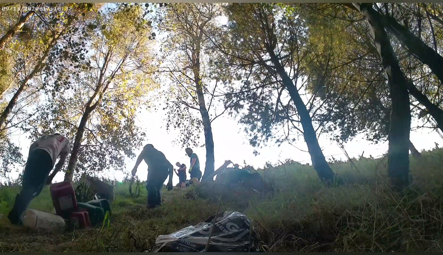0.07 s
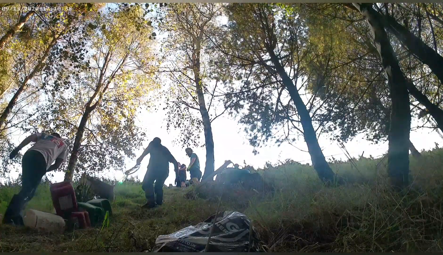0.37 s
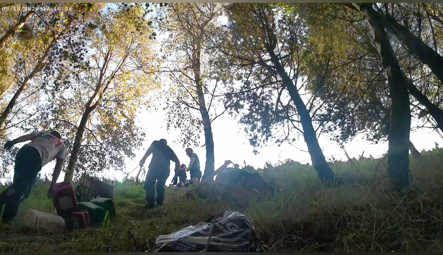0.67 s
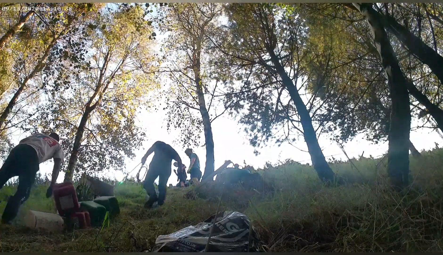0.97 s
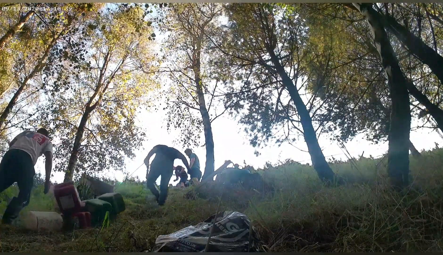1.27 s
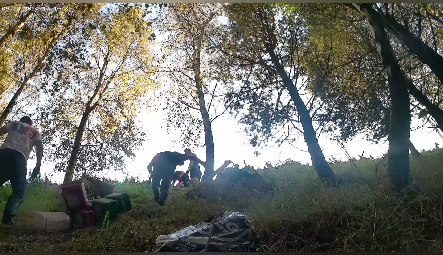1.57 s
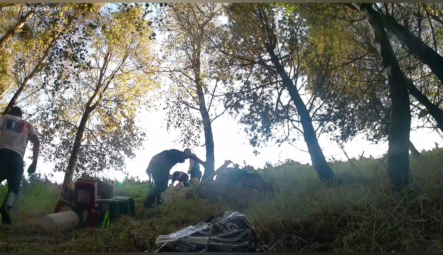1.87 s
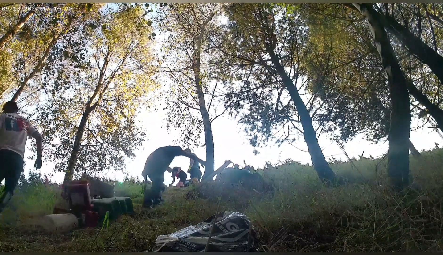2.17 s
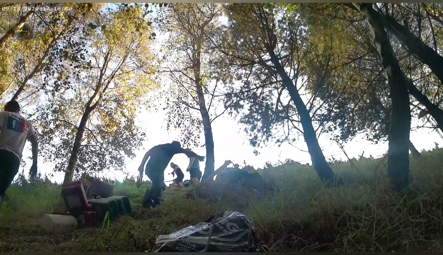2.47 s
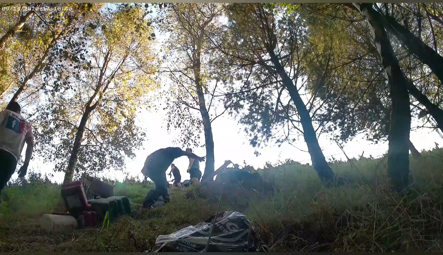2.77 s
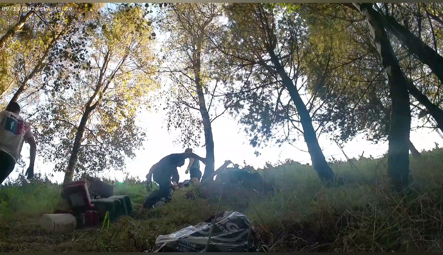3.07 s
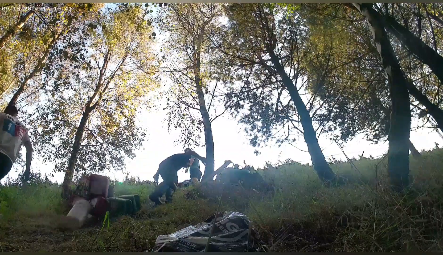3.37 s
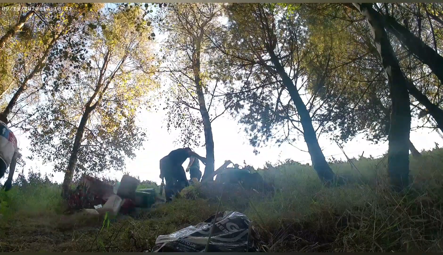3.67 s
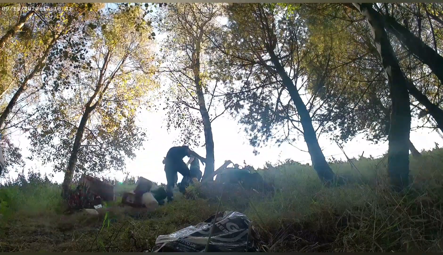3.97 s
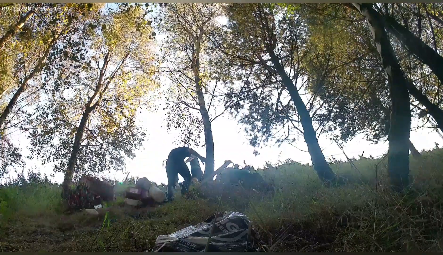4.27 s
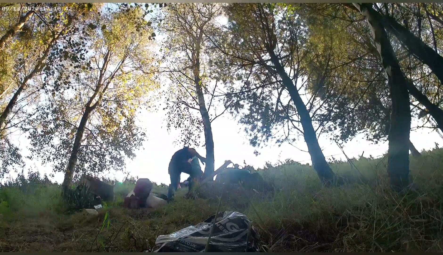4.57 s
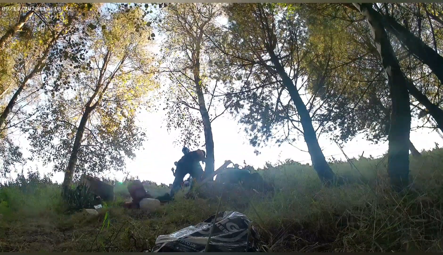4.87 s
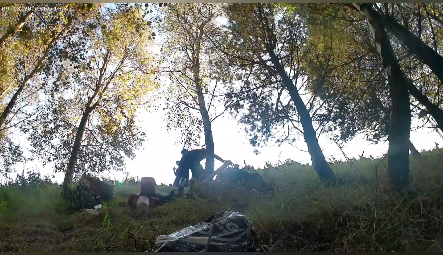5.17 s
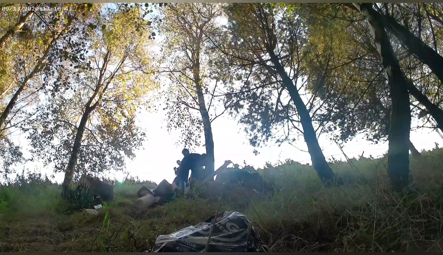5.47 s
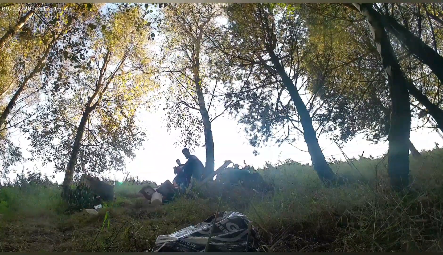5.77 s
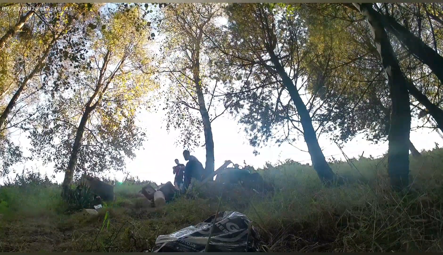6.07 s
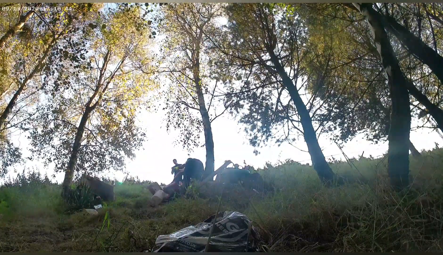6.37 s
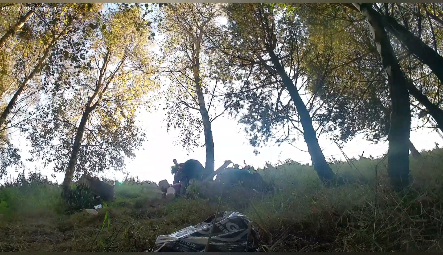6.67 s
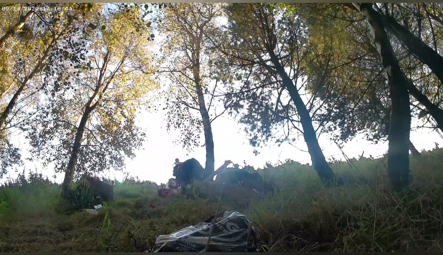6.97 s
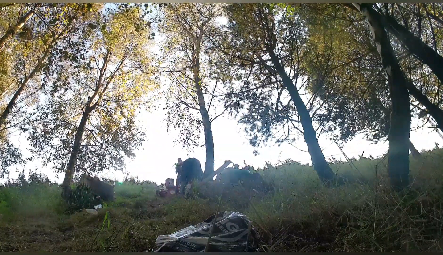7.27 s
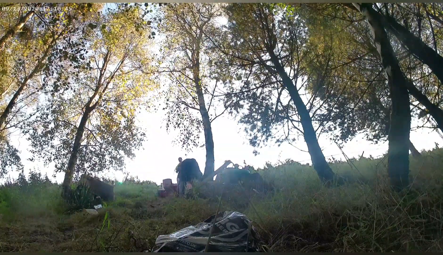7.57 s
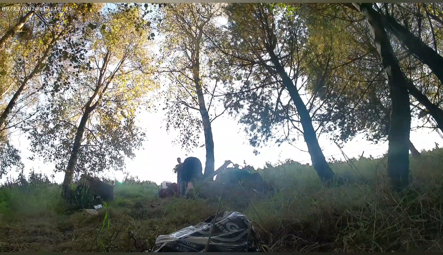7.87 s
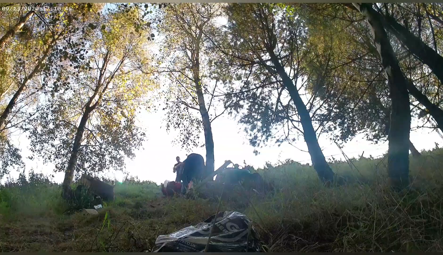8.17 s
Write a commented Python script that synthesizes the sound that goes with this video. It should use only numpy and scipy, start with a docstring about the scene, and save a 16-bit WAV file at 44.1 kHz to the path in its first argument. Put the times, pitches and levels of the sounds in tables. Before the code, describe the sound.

Light wind rumbles on the microphone over a faint, distant outdoor wash. Between about 0.5 and 2.3 seconds, a few soft, dull footsteps land on turf. Just after 3 seconds, plastic edges clack and give a tiny squeak as a load of canisters and boxes starts to be dragged nearby. From 3.4 to 4.3 seconds they tumble in a dense run of hollow thuds, the loudest part, scraping through dry grass while stems crackle and twigs snap. Softer knocks and jostling follow in uneven tugs until about 5.8 seconds. After a short lull the bumping resumes at 6.3 seconds, with a second strong cluster around 7 seconds, then lighter thuds until the end just past 8 seconds. The trees return faint, dull echoes. Far away, a low engine drone sinks in pitch and swells slightly between 5.5 and 7 seconds.

```python
"""A grassy bank under trees, one microphone in the open with a light wind on it.
Close by, after a few footfalls, dumped plastic canisters and boxes are dragged uphill in tugs.
They tumble, thud hollowly on the turf, jostle, clack and scrape through dry grass and twigs,
and the trunks throw back faint echoes. Far off lie a wash of outdoor noise and a droning engine."""
import sys
import numpy as np
from scipy import signal
from scipy.fft import rfft, irfft, next_fast_len
from scipy.io import wavfile
from scipy.ndimage import uniform_filter1d

SR = 44100
rng = np.random.default_rng(int(sys.argv[2]) if len(sys.argv) > 2 else 0)


def persist_wave(psi):
    """Save psi, clipped to +-1, as 16-bit WAV."""
    counts = np.round(np.clip(psi, -1, 1) * 32767).astype(np.int16)
    wavfile.write(sys.argv[1], SR, np.atleast_2d(counts).T)


N = 362502
TIME = np.arange(N) / SR
RUSTLE_SETTLE_S = 0.077   # how fast the rustle dies when the load stops

# Air cavities and walls of the containers. Each row: pitch in Hz, relative level in dB, t60 in seconds.
BOX_MODES = [(70.6, -19, 0.12), (91.9, -12, 0.42), (105.2, 0, 0.28), (124.9, -8.5, 0.52),
             (160.4, -4.5, 0.22), (179.6, -2, 0.28), (211.2, -1, 0.14), (239.4, -7.5, 0.11),
             (270.1, -1.5, 0.13), (318.4, -4, 0.11), (356.2, -0.5, 0.1), (424, -10, 0.15),
             (467.7, -4, 0.083), (520.4, -4.5, 0.054), (600, -10, 0.096), (690, -14.5, 0.083),
             (771, -15.5, 0.12), (778, -16, 0.015), (1064, -24.5, 0.026), (1187, -27.5, 0.082)]
# Containers landing on turf. Each row: start in seconds, relative peak in dB, relative shell slap
# in dB, favoured resonance in Hz, ring time as a share of the modes' t60.
LANDINGS = [(3.389, -19.5, -9.5, 391, 0.48), (3.412, -21.5, -3, 377, 0.49), (3.449, -26.5, -20, 186, 1),
            (3.602, -28.5, 4, 200, 1), (3.637, -19.5, -3, 216, 1), (3.671, -22.5, -13, 259, 0.77),
            (3.690, -15, -0.5, 520, 0.31), (3.752, -19, -17, 272, 1), (3.796, -21, -2, 109, .5),
            (3.846, -13, -12, 109, 0.43), (3.866, -15, -5, 301, 0.84), (3.885, -17, -3, 208, 0.87),
            (3.926, -18.5, -15, 176, 0.59), (3.958, -19.5, -2.5, 272, 0.6), (4.035, -14, -8, 248.5, 0.66),
            (4.103, -20, -2.5, 190, 1), (4.184, -22.5, -11, 170, 1), (4.227, -22.5, -3, 196, 1),
            (4.297, -34, -7, 167, 1), (4.492, -34, -11, 156, 0.85), (4.557, -31, -2, 282, 1),
            (4.595, -27, -6, 310, 1), (4.706, -25.5, -5.5, 335, 0.65), (4.749, -27.5, 0, 530, 0.6),
            (4.781, -24, -26, 126, 1), (4.845, -29.5, -16, 125, 0.78), (5.108, -32, -7.5, 202, 0.65),
            (5.277, -31, -8, 198, 1), (5.337, -33, -3, 225, 0.68), (5.399, -27.5, -4, 144, 0.73),
            (5.499, -26, -2, 350, 0.63), (5.578, -34, -3, 106, 0.82), (5.716, -29, -4, 108, 0.79),
            (5.743, -29, -27, 111, 0.55), (6.344, -29, -16, 165, 0.85), (6.376, -24, -11, 378, 0.8),
            (6.53, -30.5, -1, 198, 1), (6.607, -42, -2, 460, 0.45), (6.665, -24.5, -3, 250, 0.79),
            (6.777, -36, -4, 128, 1), (6.885, -26.5, -2, 449, 1), (6.926, -23.5, -12, 283, 0.9),
            (6.970, -27, -16, 208, 0.56), (6.998, -19, -3.5, 272, 0.9), (7.016, -15.5, -13, 217, 0.24),
            (7.046, -23.5, -15, 177, 0.33), (7.124, -29, 2.5, 443, 0.32), (7.137, -25, -13, 255, 0.99),
            (7.243, -38.5, 8, 460, 1), (7.293, -30, -26, 251, 0.5), (7.4, -32.5, -1.5, 600, 0.37),
            (7.448, -32.5, -0.5, 440, 0.67), (7.631, -34, 0.5, 198, 1), (7.686, -33.5, -16, 453, 0.7),
            (7.864, -27, -3, 162, 0.32), (7.884, -26.5, -3.5, 270, 0.86), (7.929, -29, -10, 161, .7),
            (7.986, -27, -2.5, 200, 0.58), (8.123, -34.5, -6, 166, .8)]
# The spectrum of a dry crack. Each row: frequency in Hz, relative level in dB.
CRACK_SPECTRUM = [(400, -13), (800, 8), (2300, 8), (3200, -8.5), (4500, -7), (6500, -32), (12000, -62)]


def from_db(db):
    """Decibels to gain."""
    return 10 ** (np.asarray(db) / 20)


def rms_one(x):
    """Scale to rms 1."""
    return x / np.sqrt(np.mean(x ** 2) + 1e-20)


def drift(rate_hz):
    """Smooth random wandering of spread 1."""
    step, run_in = 40, 2000
    pole = np.exp(-2 * np.pi * rate_hz * step / SR)
    noise = rng.standard_normal(N // step + run_in + 2)
    slow = signal.lfilter([1], [1, -2 * pole, pole * pole], noise)[run_in:]
    return np.interp(np.arange(N) / step, np.arange(len(slow)), rms_one(slow))


def colour(x, spectrum):
    """Minimum-phase filter with a (Hz, dB) outline, falling 10 dB an octave past its ends; rms 1."""
    size = next_fast_len(N + SR // 2) * 2
    hz, db = np.transpose(spectrum)
    octave = np.log2(np.maximum(np.arange(size // 2 + 1) * SR / size, 1))
    outside = np.maximum(np.log2(hz[0]) - octave, 0) + np.maximum(octave - np.log2(hz[-1]), 0)
    gain = from_db(np.interp(octave, np.log2(hz), db) - 10 * outside)
    cepstrum = irfft(np.log(gain), size)
    cepstrum[size // 2:] = 0
    return rms_one(irfft(rfft(x, size) * np.exp(2 * rfft(cepstrum)), size)[:N])


def ring(force, hz, t60):
    """A unit click sets a dying sine of height 1 ringing."""
    pole = from_db(-60 / (max(t60, .001) * SR))
    angle = 2 * np.pi * hz / SR
    return signal.lfilter([0, np.sin(angle)], [1, -2 * pole * np.cos(angle), pole * pole], force + 1e-18)


def even(x, span_s):
    """Take out slow level changes and keep the fine grain."""
    power = np.abs(uniform_filter1d(x ** 2, max(int(span_s * SR), 2)))
    return x / np.sqrt(power + 1e-4 * np.mean(x ** 2))


def clicks(per_s, spread_db):
    """Random clicks of uneven size and sign."""
    pulses = (rng.random(N) < per_s / SR) * rng.choice([-1, 1], N)
    return pulses * from_db(spread_db * np.minimum(rng.exponential(1, N), 4))


def add(out, s, sound):
    """Mix a sound in at time s."""
    start = max(int(s * SR), 0)
    out[start:start + len(sound)] += sound[:N - start]


def outdoors(wash_db, swell_db, hiss_db, wind_db, gust_db):
    """A far wash that barely swells, thin hiss of leaves and microphone, and lumpy wind on the capsule."""
    # The course of the far wash. Each row: time in seconds, relative level in dB.
    wash_levels = [(0, -58.5), (1.7, -56), (2.3, -56), (3.0, -56.5), (4.4, -55), (6.0, -58.5),
                   (8.22, -58.5)]
    # Spectra of wash, hiss and wind. Each row: frequency in Hz, relative level in dB.
    wash_spectrum = [(100, -4), (200, -0.5), (300, 1.5), (450, -2), (700, 1.5), (900, -2), (1250, -7),
                     (1800, -15.5), (2600, -25.5), (4000, -36.5)]
    hiss_spectrum = [(1000, -2.5), (2200, 6.5), (3100, 2.5), (4300, 3.5), (5500, 1.5), (7500, -1.5),
                     (10000, -0.5), (15500, -2.5)]
    wind_spectrum = [(20, -5), (35, 1.5), (55, -1.5), (85, 0.5), (130, -4), (190, -4.5), (300, -16),
                     (600, -47)]
    s, db = np.transpose(wash_levels)
    wash_gain = from_db(wash_db + swell_db * drift(3.0) + np.interp(TIME, s, db))
    wash = wash_gain * colour(rng.standard_normal(N), wash_spectrum)
    hiss = from_db(hiss_db) * colour(rng.standard_normal(N), hiss_spectrum)
    wind = from_db(wind_db + gust_db * drift(7.3)) * colour(rng.standard_normal(N), wind_spectrum)
    return wash + hiss + wind


def engine(octave_db):
    """A far engine drones at its firing rate and the octave above, swelling as it sinks in pitch."""
    # The course of the drone. Each row: time in seconds, firing rate in Hz, level in dB.
    course = [(0, 70, -74), (2.8, 65, -61), (4.4, 58, -62), (5.1, 55, -58), (5.6, 54, -50.5),
              (6.9, 54.5, -51), (8.22, 55.5, -58)]
    s, hz, db = np.transpose(course)
    firing_hz = np.interp(TIME, s, hz) * (1 + 0.0051 * drift(2.5))
    phase = 2 * np.pi * np.cumsum(firing_hz) / SR
    tone = np.sin(phase) + from_db(octave_db + 3.4 * drift(1.8)) * np.sin(2 * phase)
    return np.sqrt(2) * from_db(np.interp(TIME, s, db) + 1.1 * drift(4.0)) * tone


def impact(slap_db, focus_hz, focus_db, ring_share, sink_s, rebound_s, rebound_db):
    """The shell slaps at first touch, the body booms once the turf is pressed, then rebounds; peak 1."""
    size = SR // 2
    later = rng.uniform(0.199, 1, 3)
    contact_s = np.append([0, sink_s], sink_s + later * rebound_s)
    at = (contact_s * SR).astype(int)
    rebounds = from_db(rebound_db) * (1 - later / 2)
    body, shell = np.zeros((2, size))
    for hz, db, t60 in BOX_MODES:
        in_body = hz < 380   # higher modes belong to the shell
        strength = np.append([.3, 1] if in_body else [.8, .6], rebounds)
        force = np.zeros(size)
        force[at] = strength * rng.choice([-1, 1], len(at)) * rng.uniform(0.57, 1.48, len(at))
        # the face that lands favours the modes near its own pitch, and they ring on longer
        near = np.exp(-(np.log2(hz / focus_hz) / .17) ** 2)
        pitch = hz * (1 + 0.04 * rng.standard_normal())   # each mode's pitch shifts a little from blow to blow
        part = body if in_body else shell
        part += from_db(db + focus_db * near) * ring(force, pitch, t60 * ring_share * (1 + near / 2))
    sound = body / np.abs(body).max() + from_db(slap_db) * shell / np.abs(shell).max()
    return sound / np.abs(sound).max()


def radiate(x, low_hz, soft_hz):
    """Small hollow bodies push little air in the deep bass, and turf softens every contact."""
    high_pass = signal.butter(2, low_hz, "high", fs=SR, output="sos")
    low_pass = signal.butter(2, soft_hz, fs=SR, output="sos")
    return signal.sosfilt(np.vstack([high_pass, low_pass]), x)


def footfalls(gain_db, slap_db):
    """Heels on soft ground give short dull bumps."""
    # Each row: start in seconds, relative peak in dB, relative slap in dB, favoured resonance in Hz.
    steps = [(0.501, -36.5, -10, 326), (0.880, -39, -15, 270), (1.328, -44.5, -16, 342),
             (1.924, -38.5, -7, 216), (1.986, -41, -1, 285), (2.102, -42.5, -25, 155),
             (2.264, -40, -4.5, 189)]
    out = np.zeros(N)
    for s, db, slap, hz in steps:
        bump = impact(slap + slap_db, hz, focus_db=6.5, ring_share=0.71,
                      sink_s=0.0015, rebound_s=0.02324, rebound_db=-3.5)
        add(out, s, from_db(db + gain_db) * bump)
    return radiate(out, low_hz=60, soft_hz=600)


def trees(x, echo_db, count=14):
    """Trunks and the bank throw faint dull echoes back to the microphone."""
    dull = signal.sosfilt(signal.butter(1, 2500, fs=SR, output="sos"), x)
    echoes = np.zeros(N)
    for delay_s in rng.uniform(.015, .16, count):
        add(echoes, delay_s, dull * rng.choice([-1, 1]) * np.exp(-delay_s / 0.11))
    return x + from_db(echo_db) * echoes


def clacks(gain_db, crack_db, crack_s):
    """Hard plastic edges meet with a dry crack and a short pitched ring."""
    # Edge strikes. Each row: start in seconds, relative peak in dB, pitch in Hz, t60 in seconds.
    strikes = [(2.469, -53, 2160, .015), (3.138, -40.5, 2040, 0.031), (3.291, -36, 1390, 0.036),
               (4.936, -45, 2530, .015), (7.402, -48.5, 990, .035)]
    # The modes of a struck edge. Each row: multiple of its pitch, relative level in dB.
    edge_modes = [(.26, -3), (.39, -2), (.52, -9), (.83, -9), (1, -6)]
    out, t = np.zeros(N), np.arange(SR // 8) / SR
    noise = colour(rng.standard_normal(N), CRACK_SPECTRUM)
    for s, db, hz, t60 in strikes:
        rings = sum(from_db(mode_db) * rng.choice([-1, 1]) * ring(t == 0, hz * multiple, t60)
                    for multiple, mode_db in edge_modes)
        crack = noise[int(s * SR):][:len(t)] * (np.exp(-t / crack_s) - np.exp(-10 * t / crack_s))
        clack = rms_one(rings) + from_db(crack_db) * rms_one(crack)
        add(out, s, from_db(db + gain_db) * clack / np.abs(clack).max())
    return out


def tugs(layer, settle_s, attack_s=0.013):
    """Gain of one sound of the moving load: each tug rises, holds and settles."""
    # Each tug rolls and slides the load a little further. Each row: start in seconds,
    # length in seconds, then relative levels of jostle, scrape and rustle in dB.
    pulls = [(3.192, 0.038, -56, -53.5, -64.5), (3.227, 0.11, -47, -52.5, -69),
             (3.369, 0.072, -44, -50.5, -66.5), (3.496, 0.22, -40.5, -59, -75),
             (3.607, 0.19, -31.5, -53, -68), (3.831, 0.039, -29.5, -44.5, -56.5),
             (3.936, 0.17, -31, -56, -70), (4.202, 0.12, -34, -73, -95), (4.445, 0.37, -39.5, -64.5, -79.5),
             (4.917, 0.34, -57.5, -69.5, -80.5), (5.265, 0.51, -41.5, -66, -77),
             (5.706, 0.16, -46.5, -81, -79), (6.025, 0.047, -57, -74, -74), (6.215, 0.04, -46, -73, -86),
             (6.33, 0.482, -42, -67, -78), (6.912, 0.077, -31.5, -57.5, -71),
             (6.972, 0.045, -27, -61, -67.5), (7.125, 0.28, -45, -67.5, -84),
             (7.392, 0.16, -47.5, -87, -84), (7.59, 0.13, -46, -84, -83), (7.871, 0.19, -41.5, -68, -83)]
    column = ("jostle", "scrape", "rustle").index(layer)
    power = np.zeros(N)
    for s, length_s, *levels_db in pulls:
        t = np.maximum(TIME - s, 0)
        held = from_db(levels_db[column]) * np.minimum(t / attack_s, 1)
        power += (held * np.exp(-np.maximum(t - length_s, 0) / settle_s)) ** 2
    return np.sqrt(power)


def jostle(gain_db, knocks_per_s, soft_hz):
    """Containers of three sizes knock softly against each other while the load rolls."""
    rings = 0
    for size in (.93, 1, 1.08):
        knocks = clicks(knocks_per_s, spread_db=2.5)
        for hz, db, t60 in BOX_MODES:
            softened = from_db(db) / (1 + (hz / soft_hz) ** 2)
            rings += softened * ring(knocks * rng.uniform(-0.87, 1, N), hz / size, t60)
    return from_db(gain_db) * tugs("jostle", settle_s=.035) * even(rings, span_s=0.078)


def friction(spectrum, grains_per_s, swish_db):
    """Dense tiny catches over a smooth swish, at an even level."""
    catches = rms_one(clicks(grains_per_s, spread_db=1.5))
    swish = from_db(swish_db) * rng.standard_normal(N)
    return even(colour(catches + swish, spectrum), span_s=0.047)


def grass(scrape_db, rustle_db, skid_db, crush_db):
    """Shells scrape the ground and brush dry grass on each tug; each landing skids and crushes stems."""
    # Spectra of shell on ground and of dry grass. Each row: frequency in Hz, relative level in dB.
    scrape_spectrum = [(450, 6.5), (750, 5.5), (1000, -4), (1300, -2), (1750, -8.5), (2200, -7.5),
                       (2600, -15.5), (3200, -26), (5000, -34.5)]
    rustle_spectrum = [(2000, -2), (3100, -3.5), (3800, 8.5), (4500, 7), (5400, -3), (7000, -10),
                       (9500, -15), (12000, -18), (16000, -44)]
    skid = skids(decay_s=0.017)
    scraping = np.hypot(from_db(scrape_db) * tugs("scrape", settle_s=0.064), from_db(skid_db) * skid)
    rustling = np.hypot(from_db(rustle_db) * tugs("rustle", RUSTLE_SETTLE_S), from_db(crush_db) * skid)
    scrape = scraping * friction(scrape_spectrum, grains_per_s=650, swish_db=-1.5)
    rustle = rustling * friction(rustle_spectrum, grains_per_s=1500, swish_db=-4.5)
    return scrape + rustle


def stems(gain_db, breaks_per_s):
    """Single dry stems crackle as the load rolls over them."""
    # The spectrum of a breaking stem. Each row: frequency in Hz, relative level in dB.
    stem_spectrum = [(900, -17), (1500, 0), (2300, 3), (3100, -7), (4400, -0.5), (5800, -11.5), (9000, -28)]
    crackle = colour(clicks(breaks_per_s, spread_db=2.0), stem_spectrum)
    return from_db(gain_db) * tugs("rustle", RUSTLE_SETTLE_S) * crackle


def squeak(start_s, length_s, hz, waver_hz, db):
    """Plastic sticks and slips with a short squeak as the load first moves."""
    swell = np.sin(np.pi * np.clip((TIME - start_s) / length_s, 0, 1))
    phase = 2 * np.pi * np.cumsum(hz + waver_hz * drift(82)) / SR
    return from_db(db) * np.sqrt(np.abs(swell)) * np.sin(phase)


def twigs(gain_db, ring_db, ring_cycles):
    """A twig snaps in a short splintering burst, coloured by a heavily damped woody resonance."""
    # Each row: start in seconds, relative peak in dB, resonance in Hz, crackle decay in seconds.
    snaps = [(3.382, -48, 2360, 0.0023), (3.628, -38.5, 2280, 0.0033), (3.692, -44, 1290, 0.0048),
             (3.844, -43, 4320, 0.009), (3.866, -48, 2150, 0.021), (4.078, -39.5, 2210, 0.0072),
             (4.231, -51, 1260, 0.008), (4.49, -47.5, 1590, .005), (4.704, -44.5, 1720, 0.0063),
             (5.032, -48.5, 2160, 0.0034), (5.148, -49.5, 1610, 0.0066), (5.342, -48, 2140, 0.0052),
             (6.925, -50, 1910, 0.0027), (7.41, -49, 1020, 0.017)]
    out, t = np.zeros(N), np.arange(SR // 8) / SR
    splinters = colour(rng.standard_normal(N), CRACK_SPECTRUM)
    for s, db, hz, crack_s in snaps:
        burst = splinters[int(s * SR):][:len(t)] * (np.exp(-t / crack_s) - np.exp(-10 * t / crack_s))
        snap = rms_one(burst) + from_db(ring_db) * rms_one(ring(burst, hz, ring_cycles / hz))
        add(out, s, from_db(db + gain_db) * snap / np.abs(snap).max())
    return out


def thuds(gain_db, slap_db):
    """The containers land on the turf with hollow thuds, each with its own pitch and ring time."""
    out = np.zeros(N)
    for s, db, slap, hz, ring_share in LANDINGS:
        thud = impact(slap + slap_db, hz, focus_db=8.0, ring_share=ring_share,
                      sink_s=0.00301, rebound_s=.018, rebound_db=-8)
        add(out, s, from_db(db + gain_db) * thud)
    return out


def skids(decay_s):
    """Gain of the short skid after each landing: the harder the slap, the louder."""
    power, t = np.zeros(N), np.arange(SR // 2) / SR
    for s, db, slap, *_ in LANDINGS:
        add(power, s, (from_db(db + slap) * np.exp(-t / decay_s)) ** 2)
    return np.sqrt(power)


def scene():
    """The tumbling load close to the microphone, with the outdoors behind it, in mono."""
    load = thuds(gain_db=-2.15, slap_db=-3.64) + jostle(gain_db=-2.0, knocks_per_s=40, soft_hz=650)
    close = radiate(load, low_hz=51.6, soft_hz=2220)
    close += footfalls(gain_db=1.0, slap_db=2.5)
    close += grass(scrape_db=3.0, rustle_db=-2.0, skid_db=-27.5, crush_db=-53)
    close += stems(gain_db=-3.0, breaks_per_s=140)
    close += twigs(gain_db=-2.0, ring_db=-3.0, ring_cycles=14)
    close += clacks(gain_db=2.0, crack_db=-4.5, crack_s=0.0054)
    close += squeak(start_s=3.201, length_s=0.039, hz=1300, waver_hz=50, db=-45)
    ambience = outdoors(wash_db=-2.76, swell_db=1.0, hiss_db=-72.5, wind_db=-55.0, gust_db=-0.5)
    ambience += engine(octave_db=-11.0)
    return (trees(close, echo_db=-16.0) + ambience)[None]


def record(dry):
    """The recorder cuts the treble above 15.6 kHz; its converter rests slightly below zero."""
    return signal.sosfilt(signal.ellip(10, .1, 70, 15600, fs=SR, output="sos"), dry) - .0046


dry = scene()
out = record(dry)
persist_wave(out)
```